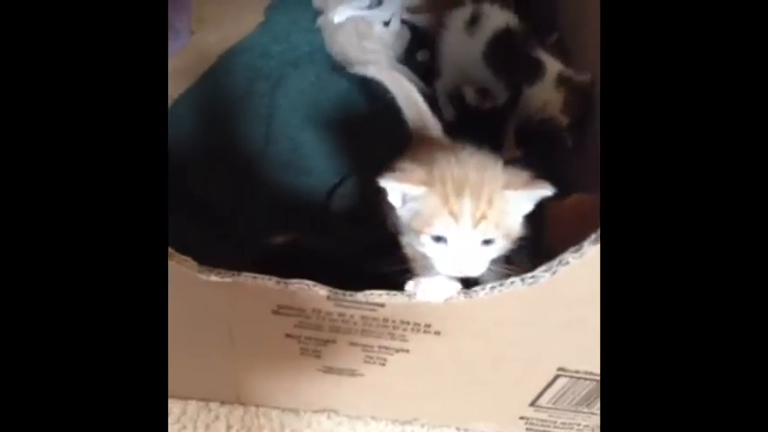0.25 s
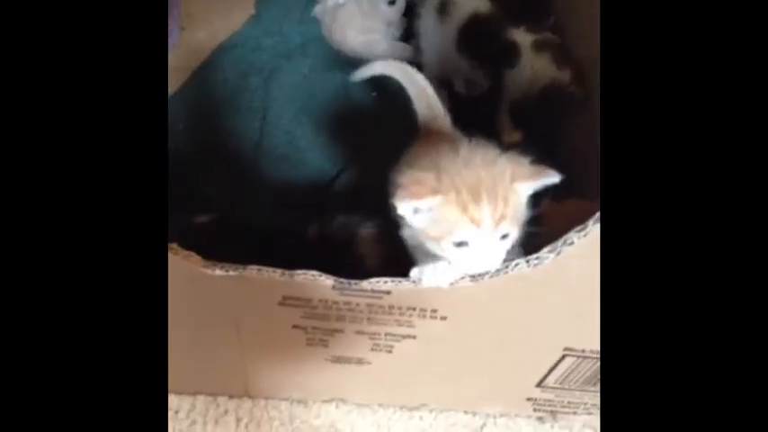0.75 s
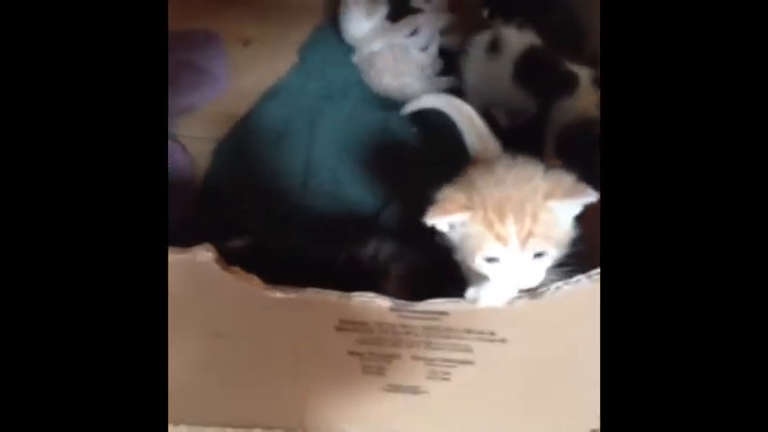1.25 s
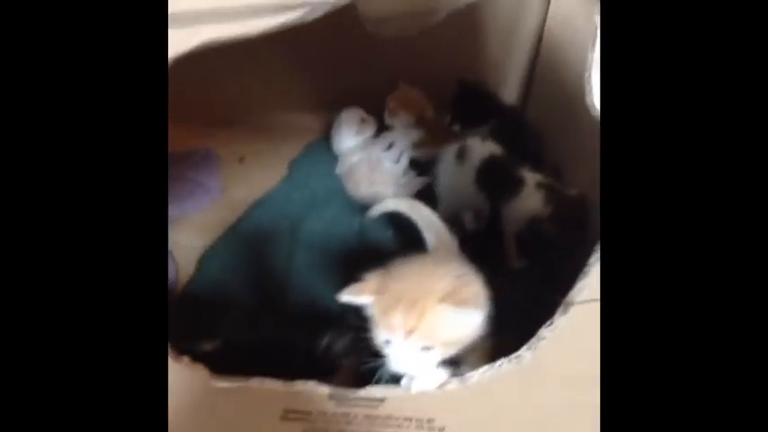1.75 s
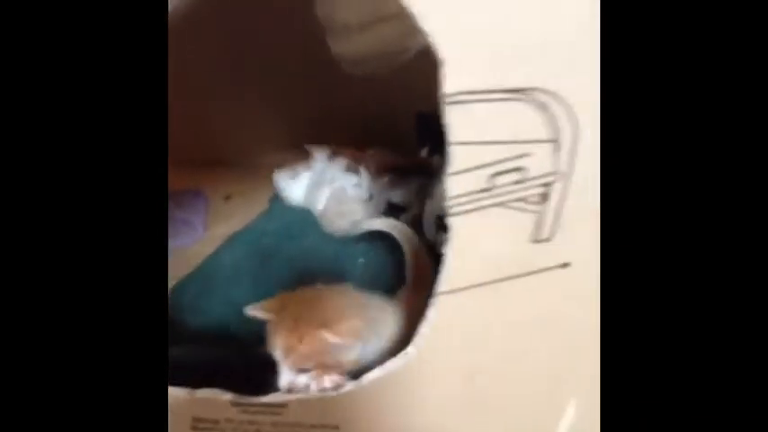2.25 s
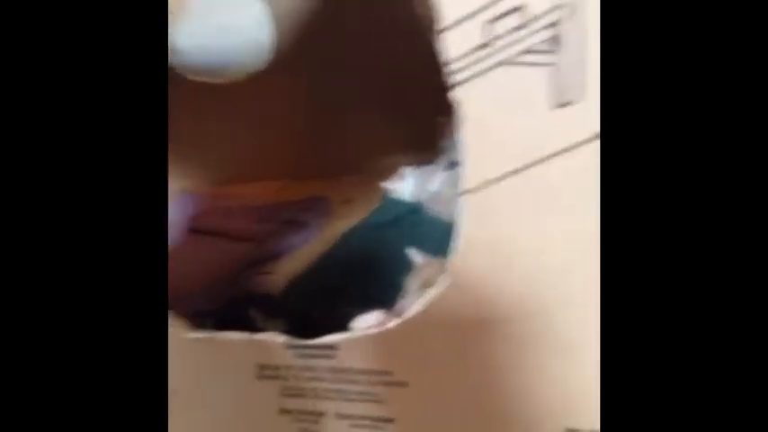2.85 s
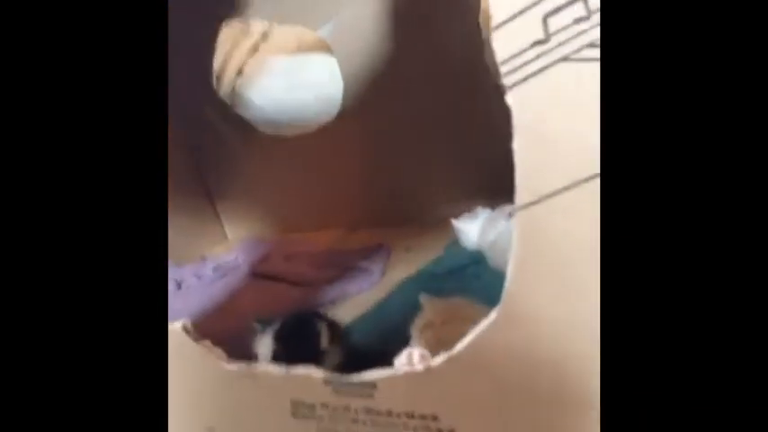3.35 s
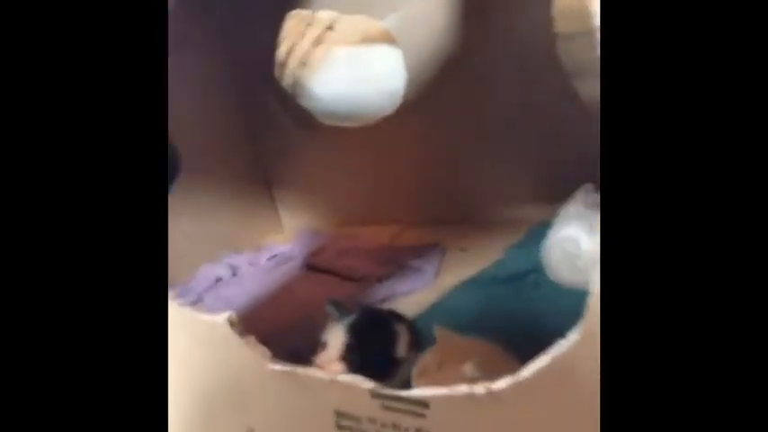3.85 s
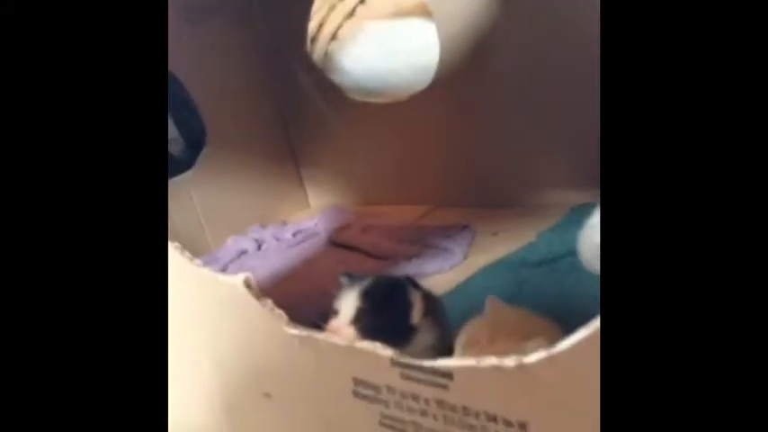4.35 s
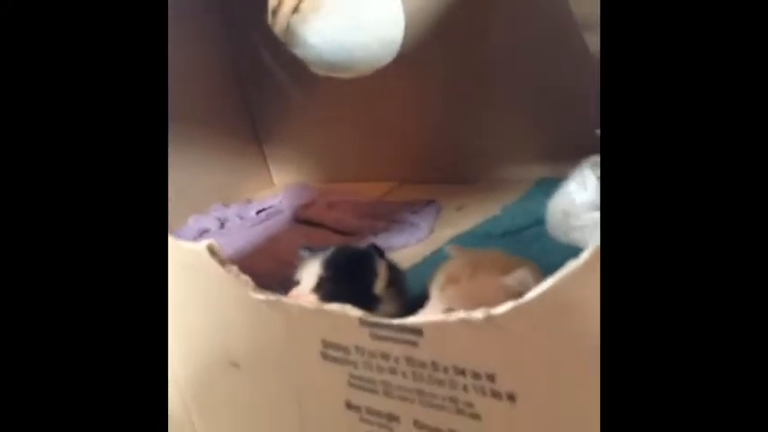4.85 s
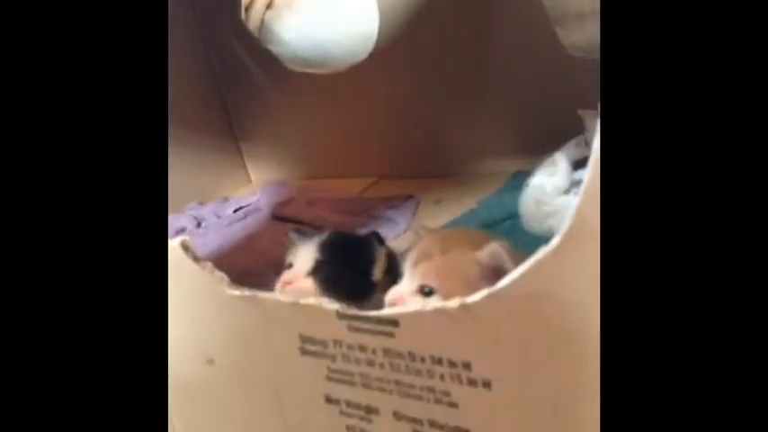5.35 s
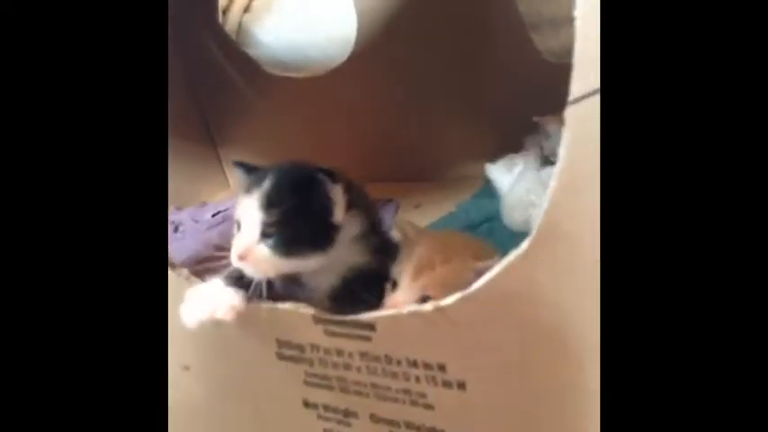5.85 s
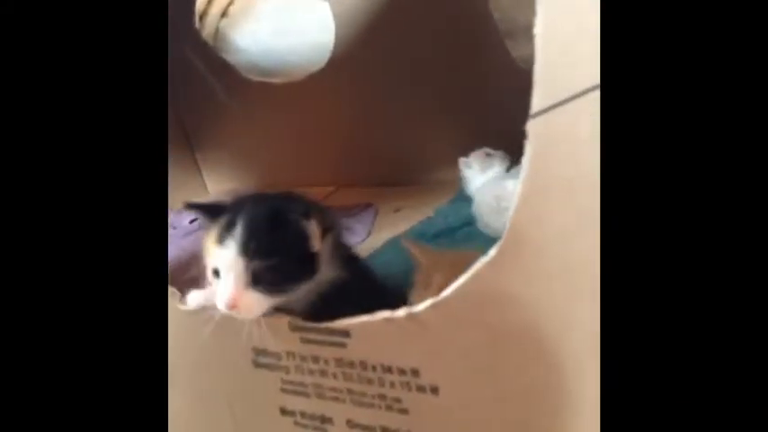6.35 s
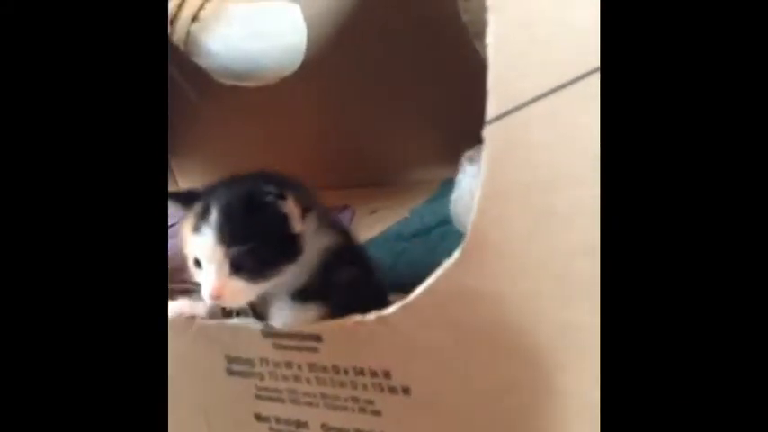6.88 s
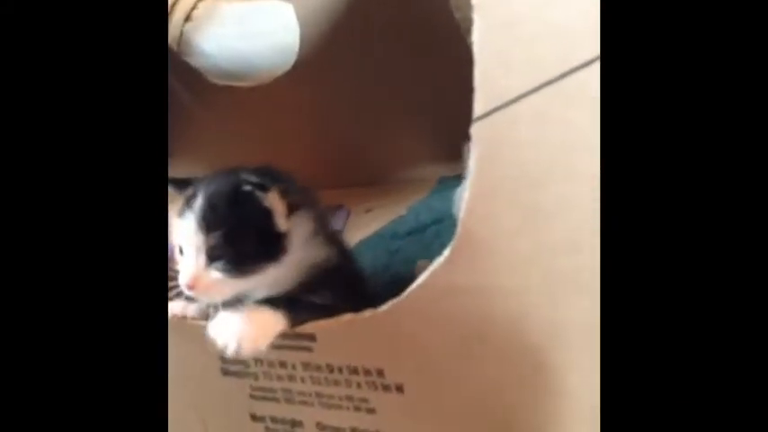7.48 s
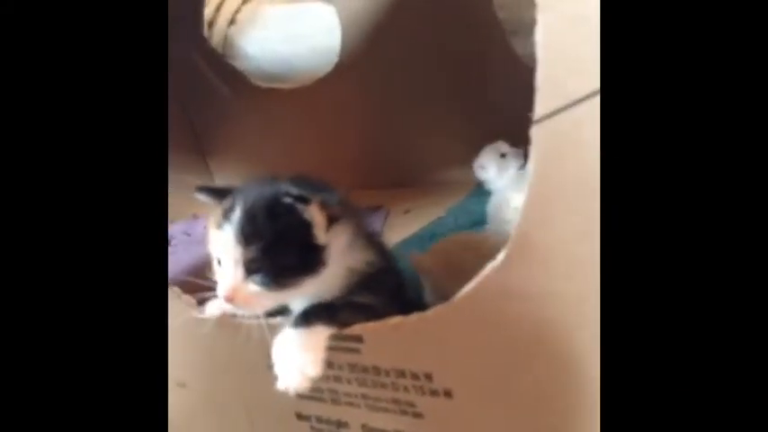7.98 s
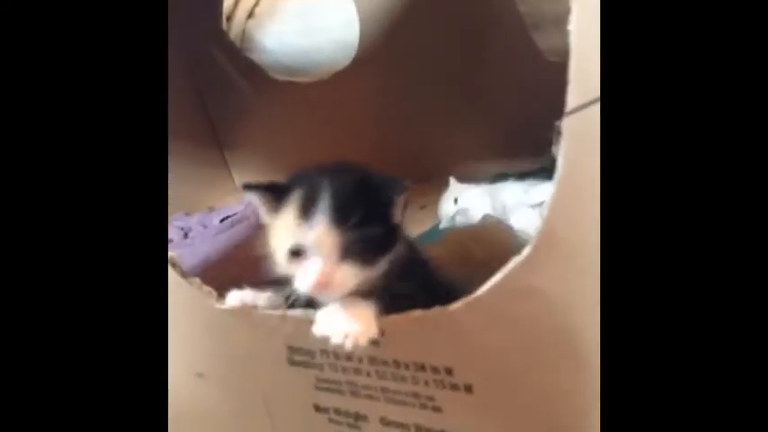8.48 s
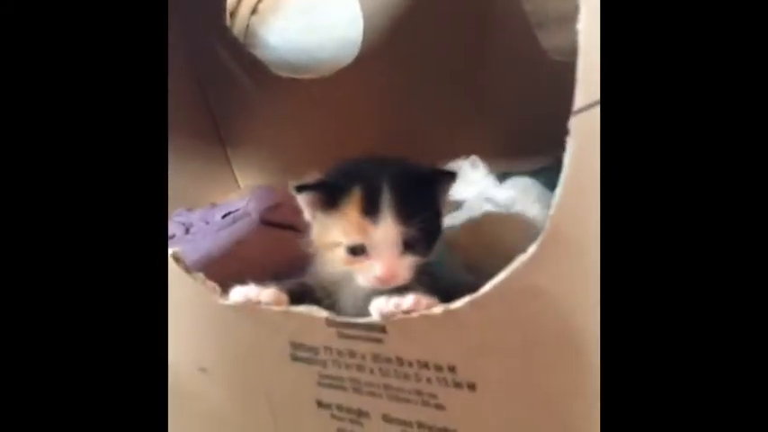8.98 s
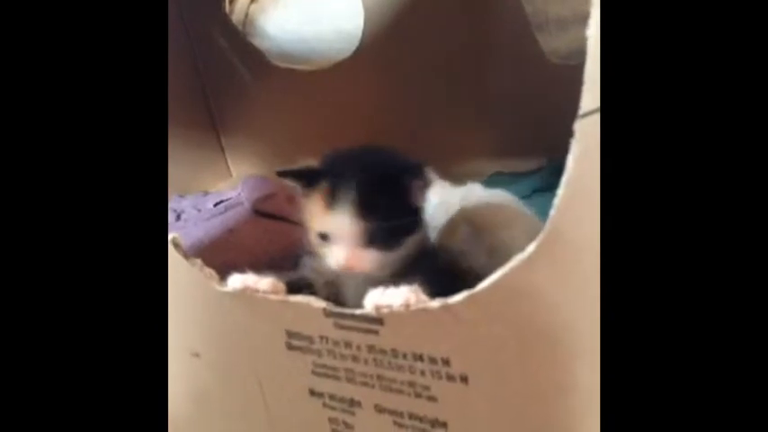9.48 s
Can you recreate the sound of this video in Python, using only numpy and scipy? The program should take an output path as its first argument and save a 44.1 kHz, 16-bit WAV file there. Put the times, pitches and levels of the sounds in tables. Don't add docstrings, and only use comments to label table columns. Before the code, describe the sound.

Kittens shift inside a cardboard box in a quiet room: soft thuds, dry claw ticks and scratches, and two brief hissing slides.

```python
import sys
import numpy as np
from scipy import signal
from scipy.fft import rfft, irfft, next_fast_len
from scipy.io import wavfile
from scipy.ndimage import uniform_filter1d, map_coordinates

SR = 44100
rng = np.random.default_rng(int(sys.argv[2]) if len(sys.argv) > 2 else 0)


def transcribe(u):
    v = np.clip(np.atleast_2d(u).T, -1, 1)
    q = np.round(v * 32767).astype(np.int16)
    wavfile.write(sys.argv[1], SR, q)


def gain_from_decibels(decibels):
    exponent = np.asarray(decibels, float) / 20
    return 10 ** exponent


N = 428652
T = np.arange(N) / SR

# freq_hz, density_db (per Hz)
MURMUR = [(20, -30), (50, -19.5), (90, -13), (130, -2), (200, -2.5), (300, -10.5), (500, -6.5),
          (900, -18.5)]
# freq_hz, density_db (per Hz)
MIC_HISS = [(200, -23), (800, -13.5), (1500, -14.5), (4000, -13), (9000, -15), (15600, -16.5)]
# time_s, stirring_db
RESTLESSNESS = [(0.0, -79), (0.9, -86), (1.16, -66), (1.92, -77), (2.43, -59.5), (2.73, -70), (3.19, -81),
                (3.9, -70), (4.36, -67.5), (4.84, -58.5), (4.98, -77), (5.4, -55.5), (5.74, -67.5),
                (7.28, -67), (7.82, -71.5), (8.96, -64), (9.18, -59.5), (9.72, -77)]
# pitch_hz, level_db, t60_s
PANEL_MODES = [(167.2, 0, 0.12), (215.6, -4, 0.12), (291, -2, 0.039)]
# pitch_hz, level_db, t60_s
BOARD_MODES = [(416, -2, 0.038), (560, -6, 0.033), (698, -1.5, 0.027), (869, 0, 0.038), (955, 1.5, 0.026),
               (1235, -2, 0.022), (1426, -13, 0.016), (1830, -11.5, 0.029)]
# start_s, peak_db, board_rel_db, upper_panel_rel_db
BUMPS = [(0.158, -53, 2, -4), (0.705, -49.5, -28, -9.5), (0.976, -52, -14, -2), (1.267, -42, -17, -6),
         (1.388, -45.5, -22, -3), (1.549, -55, -1, -9), (1.613, -46, -17, -6), (2.297, -50.5, -15, -8),
         (2.42, -41, -14, -9), (2.479, -43.5, -6, -27), (2.864, -55, 3, -4), (2.996, -56, -1, -9),
         (3.035, -63, 7, -7), (3.0659, -55, 4.5, -10), (3.6502, -27, 1, -7.5), (3.668, -41, -6, -3),
         (4.228, -42.5, -20, -17), (4.409, -48, -16, -12), (4.489, -51, -20, -13), (4.834, -50, -18, -6),
         (4.958, -51.5, -5, -3), (5.165, -46.5, -18, 6), (5.589, -53.5, 10.5, -9), (6.097, -56, -3, -19),
         (6.232, -49, -17, -15), (6.657, -54.5, -3, -16), (7.183, -47.5, -5, -11), (7.313, -47.5, 7, 1),
         (7.339, -48.5, 6, 5), (7.395, -36.5, -8, -29), (8.467, -52, -3, -9.5), (8.67, -56, -9, -13),
         (9.13, -57, 1, 3), (9.2, -53, -5, -1), (9.245, -50.5, -4, 6), (9.398, -38.5, -20, -3.5),
         (4.27, -47, -14, -11), (4.3, -51, -8, -10), (4.445, -50, -9, -6), (4.76, -53, -8, -4)]
# start_s, peak_db, centre_hz,
# board_rel_db, t60_s
TEARS = [(0.159, -26.5, 4750, -12.5, 0.035), (0.9325, -40.5, 4000, -20, 0.046),
         (1.1588, -41, 4340, -14, 0.04), (4.9546, -43, 3840, -10, 0.094), (5.4533, -47.5, 6400, 3.5, 0.028),
         (6.6928, -39, 3450, -14, 0.089), (3.5349, -45.5, 4750, -24, 0.012),
         (3.7154, -45, 3310, -17, 0.012), (5.589, -46, 2500, -14, 0.037), (6.7968, -46, 2580, -19, 0.014),
         (8.5196, -46, 1860, -5.5, 0.012), (9.0485, -46.5, 8240, -7, 0.013),
         (9.1972, -49, 5300, -8, 0.0092), (3.6497, -30, 1900, -14, 0.008), (7.222, -48, 2500, -11, 0.01)]
# start_s, peak_db, centre_hz, board_rel_db
TICKS = [(0.9754, -40, 4690, -20), (1.4014, -37.5, 4350, -18), (2.4043, -27.5, 6060, -19),
         (3.5923, -47, 2760, -2), (3.6212, -44, 4150, -5), (3.6491, -24, 6660, -22),
         (4.0015, -30, 3320, -40), (4.0422, -33, 3230, -41), (4.7109, -41, 5200, -16),
         (5.1654, -31.5, 6680, -22), (6.0425, -39.5, 4520, -15), (6.2415, -38, 4200, -16),
         (6.4173, -41, 5500, -23), (6.421, -43, 5500, -25), (6.43, -42, 5600, -32),
         (6.4457, -28, 5630, -30), (6.452, -44, 5600, -28), (6.458, -36, 5100, -25),
         (6.4637, -41, 5400, -25), (6.617, -38, 6470, -34), (7.185, -39, 6660, -14),
         (7.313, -28, 4700, -17.5), (7.3905, -35, 2600, -11), (7.396, -31, 1890, -16),
         (8.954, -35, 3180, -13), (8.958, -31, 4600, -21), (8.964, -41, 3500, -9), (8.9843, -35, 4000, -17),
         (8.989, -33, 4900, -18), (8.996, -35, 4870, -16), (8.998, -37, 4900, -19), (9.004, -36, 4970, -16),
         (9.015, -44, 5200, -13), (9.0225, -48, 5200, -7), (9.031, -49, 4500, -6)]
# start_s, peak_db, centre_hz, board_rel_db
SNAPS = [(1.758, -43, 4000, -19), (3.769, -34, 2600, -38), (5.4854, -24, 5900, -22.5),
         (7.061, -40.5, 1880, -19), (7.2532, -36, 4000, -24), (7.293, -37, 5000, -20),
         (7.3403, -22.5, 5060, -23.5), (7.881, -36, 3960, -38), (8.5392, -30.5, 3940, -32),
         (8.6088, -34, 6350, -22.5), (8.765, -43.5, 1520, -15), (9.254, -50, 2000, -10),
         (9.2665, -30.5, 4900, -37), (9.319, -34.5, 4500, -27)]
# freq_hz, density_db (per Hz)
SCRATCH_COLOUR = [(300, -21), (900, -6.5), (1700, 0.5), (3000, 0), (5000, 0.5), (9000, -2.5), (15500, -16)]
# start_s, length_s, level_db, centre_hz, lift_db
BRUSHES = [(0.186, 0.074, -66.5, 6000, 3), (3.795, 0.075, -60, 7000, -7), (4.687, 0.25, -71, 5000, -1),
           (5.798, 0.37, -67.5, 8000, 0), (6.17, 0.1, -63.5, 7000, 5), (6.535, 0.17, -63, 7000, -6),
           (6.921, .08, -70, 6200, 8), (7.239, 0.21, -61, 6000, -3), (7.446, 0.11, -66, 6500, 5),
           (7.842, 0.18, -64.5, 5000, -1), (8.16, 0.13, -66.5, 7200, 10), (8.2, .16, -67, 10000, 3),
           (8.419, 0.35, -64, 6040, -4), (8.575, 0.18, -62.5, 7500, 3), (8.967, 0.088, -63, 5000, 9),
           (9.308, 0.062, -59.5, 7000, -6)]
# freq_hz, density_db (per Hz)
FUR_COLOUR = [(1500, -24), (3500, -12.5), (7000, -8), (12000, -13), (15500, -13)]
# start_s, peak_db, centre_hz, board_rel_db,
# length_s
SCRATCHES = [(0.792, -41.5, 3500, -18, 0.031), (0.937, -36.5, 3930, -17, 0.05),
             (1.013, -45.5, 4000, -9.5, 0.037), (1.164, -45.5, 4300, -15, 0.047),
             (1.255, -44.5, 4300, -9.5, 0.043), (1.3574, -42, 1800, -11, 0.076),
             (1.384, -38, 3180, -19, 0.046), (1.543, -35.5, 3200, -15, 0.044), (1.638, -34, 3300, -15, 0.043),
             (1.7335, -45, 3770, -16, 0.038), (2.635, -47, 2500, -13, 0.016), (2.68, -48, 2500, -28, 0.031),
             (2.762, -54.5, 3500, -0.5, 0.013), (2.863, -46, 7700, -23, 0.013), (2.992, -62, 4000, -2, 0.03),
             (3.553, -43, 4700, -2, 0.055), (3.578, -43.5, 4000, -7, 0.042),
             (4.35, -49, 4000, -4.5, 0.039), (4.422, -39.5, 4300, -8, 0.035),
            (4.537, -44.5, 4200, -9.5, 0.029), (4.622, -40.5, 4200, -11, 0.044),
            (4.701, -45.5, 5200, -16, 0.073), (4.76, -43.5, 3800, -10, 0.042),
            (4.8126, -41, 4200, -10.5, 0.053), (4.969, -42.5, 3800, -4.5, 0.052),
            (5.137, -38, 4260, -9.5, 0.035), (5.151, -36.5, 6000, -14.5, 0.036),
            (5.266, -48.5, 4200, -3, 0.021), (5.327, -44, 4200, -9, 0.039), (5.359, -35.5, 4300, -5, 0.018),
            (5.374, -34, 4300, -13, 0.02), (5.392, -40.5, 2980, -8.5, 0.015),
            (5.426, -44.5, 3000, -5, 0.015), (5.4494, -52, 4200, -3, 0.028), (5.475, -43.5, 3000, 1, 0.014),
            (5.485, -41, 5500, -8, 0.018), (5.576, -42, 8300, -15, 0.012), (6.096, -42, 4800, -7, 0.021),
            (6.19, -48, 4300, -13, 0.082), (6.4, -48, 3000, -23, 0.016), (6.755, -42.5, 4300, -15, 0.036),
            (7.259, -39, 5000, -11, 0.016), (7.363, -42, 5500, -10, 0.012), (7.39, -37, 3000, -13.5, 0.01)]
# time_s, hiss_db (speed), claw_edge_db (over the hiss), weight_db (on the board)
SLIDES = [
    [(2.05, -92, -9, -64), (2.104, -53.5, -2, -65.5), (2.14, -56, 5.5, -70), (2.15, -52, 1, -76),
     (2.25, -40, -7.5, -74), (2.32, -44.5, -10, -64), (2.468, -41, -3, -55.5), (2.49, -46.5, -2, -58),
     (2.55, -98, -9, -80)],
    [(3.79, -67.5, -1, -78), (3.876, -55, -5, -67.5), (3.9, -41.5, -1.5, -67.5), (4.028, -46.5, -12.5, -65),
     (4.043, -37.5, -10, -67), (4.112, -35, 1, -67), (4.158, -41, -5.5, -59), (4.238, -58.5, -0.5, -56),
     (4.36, -78, -8, -69.5)],
]
# start_s, end_s, from_hz, to_hz, lift_db
POCKETS = [(2.08, 2.22, 1350, 1300, -5), (2.14, 2.3, 2400, 4060, 9), (2.14, 2.3, 5200, 5700, 7),
           (2.17, 2.25, 3900, 4800, 5), (2.21, 2.3, 1820, 1820, 10), (2.22, 2.31, 2160, 2600, 6),
           (2.14, 2.19, 8100, 8000, 6), (2.14, 2.19, 6600, 6800, 7), (2.2, 2.35, 7600, 7600, 6.5),
           (2.31, 2.49, 2200, 4140, 8.5), (2.31, 2.45, 4400, 6600, 6.5), (2.43, 2.49, 4100, 5400, 7.5),
           (2.42, 2.5, 1960, 2100, 9), (2.4, 2.45, 7900, 8500, 3), (2.45, 2.485, 8100, 8300, 14),
           (2.44, 2.49, 9800, 10000, 7), (3.88, 4.08, 2580, 3630, 11.5), (3.88, 3.93, 4200, 4200, 11),
           (3.96, 4.05, 4600, 5000, 5.5), (3.4, 3.96, 8500, 8500, 7.5), (3.9, 3.99, 1700, 1340, 9.5),
           (4.0, 4.12, 980, 1000, -16), (4.0, 4.14, 1800, 1400, -8), (3.98, 4.04, 6500, 6600, -7),
           (2.06, 2.3, 6000, 6000, -3), (4.04, 4.15, 2460, 2200, 12.5), (4.07, 4.14, 4200, 4900, 4),
           (3.7, 4.14, 6000, 6300, 4), (4.06, 4.16, 9200, 9460, 9), (4.1, 4.19, 2900, 3600, 8),
           (4.12, 4.24, 1260, 1100, 12)]
# freq_hz, density_db (per Hz)
SLIDE_COLOUR = [(760, -23), (1300, -8.5), (1770, -6), (2000, -5), (3210, -1), (6500, -5.5), (8450, -22),
                (14300, -120)]
# freq_hz, density_db (per Hz)
CLAW_EDGE_COLOUR = [(3820, -20.5), (6500, -8), (8080, -5.5), (9380, -6), (10500, -6.5), (15500, -16)]

QUIET_DB = -49.5
PUSH_S, HARDEN = 0.022, 0.41
SOFT_HZ = 650
DAMPED = 0.54
TICK_T60_S, TICK_RISE, SNAP_T60_S = 0.0082, 0.1, 0.0034
PANEL_SHARE_DB = -4.5


def unit(x):
    return x / np.sqrt(np.mean(x ** 2) + 1e-20)


def peak(x):
    return x / np.abs(x).max()


def along(points, hz):
    f, db = np.transpose(points)
    return gain_from_decibels(np.interp(np.log(hz + 1), np.log(f + 1), db, left=-120, right=-120))


def curves(rows):
    s, *columns = np.transpose(rows)
    return [np.interp(T, s, column) for column in columns]


def filtered(x, response):
    m = next_fast_len(len(x) + SR // 10)
    spectrum = rfft(x, m) * response(np.fft.rfftfreq(m, 1 / SR))
    return irfft(spectrum, m)[:len(x)]


def hump(hz, centre_hz, octaves, lift_db):
    distance = np.log2((hz + 1) / centre_hz) / octaves
    return gain_from_decibels(lift_db * np.exp(-0.5 * distance ** 2))


def ringing(modes):
    def response(f):
        total = 0
        for k, (pitch_hz, db, t60) in enumerate(modes):
            width = np.log(1000) / np.pi / t60
            resonance = 1j * f * width ** 0.5 / (pitch_hz ** 2 - f * f + 1j * f * width)
            total = total + (-1) ** k * gain_from_decibels(db) * resonance
        return total
    return response


def struck(modes, spread, damped=1):
    chance = spread * rng.standard_normal((len(modes), 2))
    return [(hz * (1 + 0.055 * b), db + 4.2 * a, t60 * damped) for (hz, db, t60), (a, b) in zip(modes, chance)]


def grit(spread_db, rate, count=N):
    grains = rng.standard_normal(int(count * rate / SR) + 4)
    size = map_coordinates(grains, [np.arange(count) * rate / SR], order=1)
    return unit(rng.standard_normal(count) * gain_from_decibels(spread_db * size))


def quiet():
    murmur = filtered(grit(spread_db=1.0, rate=10), lambda f: along(MURMUR, f))
    hiss = filtered(rng.standard_normal(N), lambda f: along(MIC_HISS, f))
    return gain_from_decibels(QUIET_DB) * (murmur + hiss)


def stirring():
    stir_db, = curves(RESTLESSNESS)
    panel = unit(filtered(grit(spread_db=4.5, rate=40), ringing(PANEL_MODES)))
    board = unit(filtered(grit(spread_db=4.5, rate=55), ringing(BOARD_MODES)))
    return gain_from_decibels(stir_db - 2.0) * (panel + gain_from_decibels(-8.5) * board)


def bumps():
    out, t = np.zeros(N + SR), np.arange(SR // 5) / SR
    for s, db, board_db, upper_db in BUMPS:
        length = PUSH_S * gain_from_decibels(-HARDEN * (db + 52))
        push = rng.standard_normal(len(t)) * gain_from_decibels(-26 * t / length)
        push[0] += 28
        push = filtered(push, lambda f: 1 / (1 + 1j * f / 1500) ** 2)
        knock = filtered(push, lambda f: (1j * f / 220 / (1 + 1j * f / 220)) ** 2 / (1 + 1j * f / SOFT_HZ))
        upper = [(hz, level + upper_db + 5.5, t60) for hz, level, t60 in PANEL_MODES[1:]]
        ring = ringing(struck(PANEL_MODES[:1] + upper, 0.27))
        panel = filtered(push, lambda f: ring(f) / (1 + 1j * f / 600) ** 2)
        sheet = ringing(struck(BOARD_MODES, 0.98, DAMPED))
        board = filtered(push, lambda f: sheet(f) / (1 + 1j * f / SOFT_HZ))
        upper_sound = peak(board) + gain_from_decibels(-2.5) * peak(knock)
        out[round(s * SR):][:len(t)] += gain_from_decibels(db - 2.5) * (peak(panel) + gain_from_decibels(board_db + 2.5) * upper_sound)
    return out[:N]


def walls(hz, delays):
    return 1 + sum(0.42 * np.exp(-2j * np.pi * hz * d) for d in delays)


def contacts(rows, shape, spread_db, octaves, lift_db, air_db, drive_db, spike=0):
    out, t = np.zeros(N + SR), np.arange(SR // 8) / SR
    for s, db, hz, board_db, length in rows:
        burst = grit(spread_db, 699.0, count=len(t)) * shape(t / np.clip(length, 0.001, 0.1))
        burst[0] += spike
        delays = rng.uniform(0.000304, 0.001614, 2)
        colour = lambda f: along(SCRATCH_COLOUR, f) * hump(f, hz, octaves, lift_db)
        air = filtered(burst, lambda f: colour(f) * walls(f, delays))
        board = filtered(burst, ringing(struck(BOARD_MODES, 0.75, DAMPED)))
        sound = gain_from_decibels(db + air_db) * peak(air) + gain_from_decibels(db + board_db + drive_db) * peak(board)
        out[round(s * SR):][:len(t)] += sound
    return out[:N]


def fall(u):
    return gain_from_decibels(-60 * u)


def tears():
    return contacts(TEARS, fall, spread_db=4.5, octaves=0.22, lift_db=5.5, air_db=-1.5, drive_db=-2.0)


def ticks():
    swell = lambda u: fall(u) * u / (u + TICK_RISE)
    rows = [(*row, TICK_T60_S) for row in TICKS]
    return contacts(rows, swell, spread_db=4.0, octaves=0.17, lift_db=11.5, air_db=-4, drive_db=1.5)


def snaps():
    rows = [(*row, SNAP_T60_S) for row in SNAPS]
    return contacts(rows, fall, spread_db=0.0, octaves=0.45, lift_db=9.5, air_db=-1.0, drive_db=4.0, spike=5.1)


def brushing():
    out, count = np.zeros(N + SR), SR // 3
    for s, length, db, hz, lift_db in BRUSHES:
        hairs = grit(spread_db=1.5, rate=107, count=count)
        colour = lambda f: along(FUR_COLOUR, f) * hump(f, hz, octaves=0.29, lift_db=lift_db)
        swell = np.sin(np.pi * np.minimum(T[:count] / length, 1))
        out[round(s * SR):][:count] += gain_from_decibels(db) * unit(filtered(hairs, colour)) * swell
    return out[:N]


def scratches():
    shape = lambda u: (u < 1) * np.abs(np.sin(np.pi * np.minimum(u, 1) ** 0.66))
    return contacts(SCRATCHES, shape, spread_db=4.0, octaves=0.35, lift_db=5.0, air_db=-5, drive_db=0.0)


def rubbing():
    hz, t, z = signal.stft(grit(spread_db=1.5, rate=400), SR, nperseg=256)
    lift_db = np.zeros(z.shape)
    for start, end, from_hz, to_hz, db in POCKETS:
        centre = np.interp(t, [start, end], [from_hz, to_hz])
        fade = np.clip(np.minimum(t - start, end - t) / 0.025 + 0.5, 0, 1)
        distance = (hz[:, None] - centre) / (230 + 0.03 * centre)
        lift_db += db * fade * np.exp(-0.5 * distance ** 2)
    patches = uniform_filter1d(uniform_filter1d(rng.standard_normal(z.shape), 3, 0), 9, 1)
    lift_db += 2.2 * unit(patches)
    return signal.istft(z * gain_from_decibels(lift_db), SR, nperseg=256)[1][:N]


def slides():
    rub = rubbing()
    level = lambda x: x / np.sqrt(np.abs(uniform_filter1d(x ** 2, 2200)))
    hiss = level(filtered(rub, lambda f: along(SLIDE_COLOUR, f)))
    edge = level(filtered(rub, lambda f: along(CLAW_EDGE_COLOUR, f)))
    drag = grit(spread_db=4.0, rate=90)
    board = unit(filtered(drag, ringing(BOARD_MODES)))
    panel = unit(filtered(drag, ringing(PANEL_MODES)))
    body = board + gain_from_decibels(PANEL_SHARE_DB) * panel
    out = np.zeros(N)
    for rows in SLIDES:
        db, edge_db, weight_db = curves(rows)
        on = (T > rows[0][0]) & (T < rows[-1][0])
        out += on * (gain_from_decibels(db) * (hiss + gain_from_decibels(edge_db) * edge) + gain_from_decibels(weight_db) * body)
    return out


def echoes(x):
    t = np.arange(SR // 5) / SR
    tail = filtered(rng.standard_normal(len(t)), lambda f: 1 / (1 + (f / 5000) ** 2))
    tail = tail * gain_from_decibels(-60 * t / 0.12)
    delayed = np.pad(x, (130, 0))
    return signal.fftconvolve(delayed, tail / np.linalg.norm(tail))[:N]


def scene():
    near = bumps() + tears() + ticks() + snaps() + scratches() + slides()
    return (near + gain_from_decibels(-15.0) * echoes(near) + stirring() + brushing())[None]


def low_pass(x):
    return signal.sosfilt(signal.butter(12, 16390, fs=SR, output="sos"), x)


def record(dry):
    bass = lambda f: 1j * f / 120
    port = lambda f: (bass(f) ** 2 / (1 + 1.17 * bass(f) + bass(f) ** 2)) ** 2 + 0.017
    top_cut = lambda f: 1 / (1 + (f / 15440) ** 120) + 0.022 / (1 + (f / 16400) ** 120)
    mix = filtered(filtered(dry[0], port) + quiet(), top_cut)
    return low_pass(mix[None])


dry = scene()
out = record(dry)
transcribe(out)
```